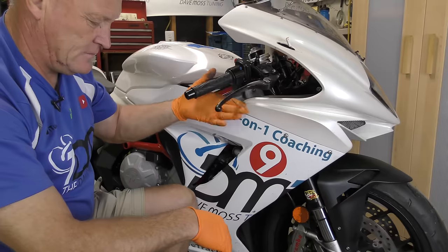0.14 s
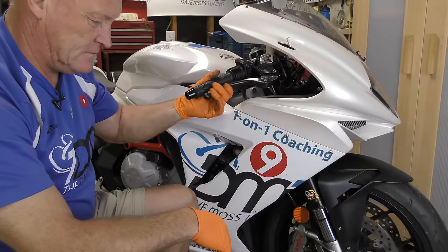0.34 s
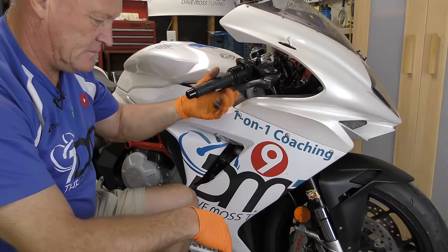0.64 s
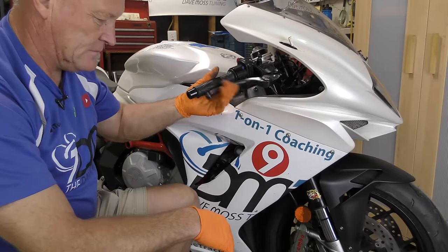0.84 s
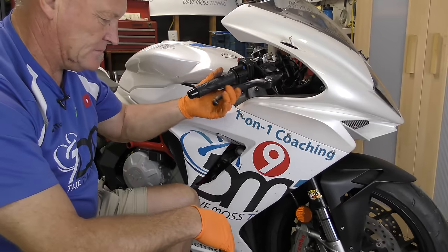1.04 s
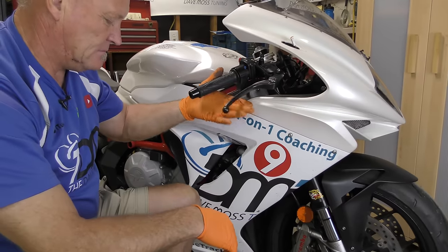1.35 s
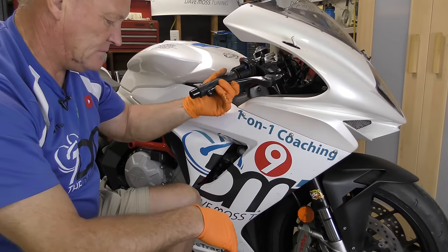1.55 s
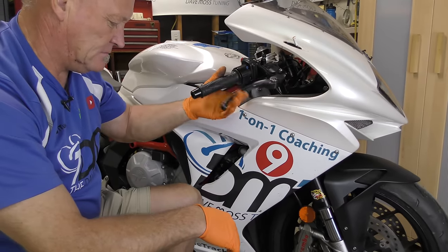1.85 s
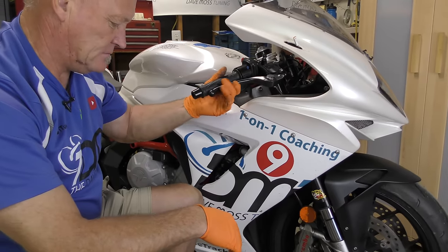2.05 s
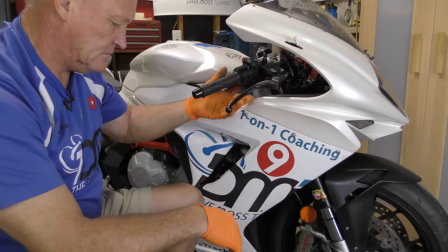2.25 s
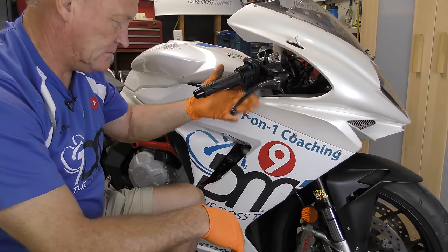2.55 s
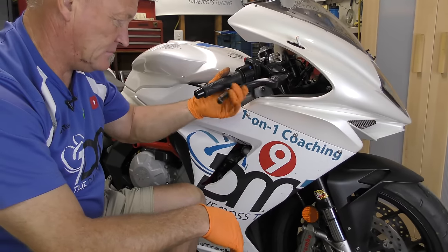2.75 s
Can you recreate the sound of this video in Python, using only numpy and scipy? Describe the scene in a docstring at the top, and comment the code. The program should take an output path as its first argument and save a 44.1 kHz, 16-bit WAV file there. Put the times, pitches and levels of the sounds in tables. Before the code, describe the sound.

Motorcycle brake lever pumped by a gloved hand, sharp double clacks repeating steadily, close and indoors

```python
"""In a workshop, a gloved hand pumps a motorcycle's front brake lever seven times.
Each time it slips from the fingers, clacks on its stop, rebounds, rattles and is caught, with ticks and glove squeaks.
The contacts are coloured noise bursts; handlebar and fairing answer with decaying modes and dense panel noise.
Squeaks and thin high whistles are gliding tones. Direct sound and room reverberation reach the microphone
over a steady room tone, with the extreme treble cut."""
import sys
import numpy as np
from scipy import signal
from scipy.fft import rfft, irfft
from scipy.io import wavfile
from scipy.ndimage import uniform_filter1d

SR = 44100
rng = np.random.default_rng(int(sys.argv[2]) if len(sys.argv) > 2 else 0)


def file_out(sig):
    """Save sig as 16-bit WAV at sys.argv[1]."""
    # one column per channel
    cols = np.atleast_2d(sig).T
    # limit, then scale
    lim = np.clip(cols, -1, 1)
    pcm = np.round(lim * 32767).astype(np.int16)
    wavfile.write(sys.argv[1], SR, pcm)


N = 127890  # samples in the whole scene
SIZE = 32768  # samples in one event
AGE = np.arange(SIZE) / SR  # seconds since an event began

# The lever hits its stop. Each row: start in seconds, relative level in dB.
CLACKS = [(.1178, -0.5), (0.4961, -0.5), (.8989, -0.5), (1.2819, 0), (1.7116, 0), (2.135, 0), (2.5550, 0)]
# It rebounds. Each row: start in seconds, relative level in dB.
REBOUNDS = [(.1392, -3), (0.516, -3), (0.9208, -3.5), (1.3044, -3.5), (1.7353, -4), (2.1581, -4),
            (2.5784, -5)]
# It rattles to rest. Each row: start in seconds, relative level in dB.
RATTLES = [(.1812, -9), (0.553, -11), (0.9648, -8.5), (1.3484, -8.5), (1.7798, -8), (2.2011, -9.5),
           (2.623, -8.5)]
# The fingers catch it. Each row: start in seconds, relative slap level in dB, relative dull knock level in dB.
CATCHES = [(.2700, -10.5, -5.5), (0.6495, -10, -4.5), (1.0393, -10, -1), (1.4361, -12, -12),
           (1.8584, -12, -8.5), (2.3030, -11.5, -10.5), (2.7187, -11.5, -9)]
# Small ticks as it is squeezed. Each row: start in seconds, relative level in dB.
TICKS = [(.7630, -22.5), (.8110, -31), (1.1455, -27), (1.1860, -27), (1.4095, -29), (1.5518, -21.5),
         (1.9634, -19), (2.4102, -19.5), (2.8243, -20)]
# The rubber glove squeaks. Each row: start in seconds, relative level in dB, start in Hz, end in Hz.
SQUEAKS = [(1.624, -38.5, 1613, 4060), (1.873, -44, 1766, 1810), (2.043, -33.5, 1613, 4530),
           (2.318, -39, 1775, 1920), (2.473, -42, 1640, 4050), (2.734, -35.5, 1757, 1820)]
# Faint falling whistles. Each row: start in seconds, length in seconds, start in Hz, end in Hz,
# relative level in dB.
WHISTLES = [(0.0, .07, 12750, 12000, -65), (1.49, .13, 12100, 10100, -64)]
# A rattle is a quick run of touches. Each row: delay in seconds, level change in dB.
TOUCHES = [(0.0, -2), (.0033, 1.5), (.0078, -8)]
# The bar rocks against the fairing afterwards. Each row: delay in seconds, level change in dB.
ROCKING = [(.003, -1), (.021, -0.5), (.049, -7)]

# Colours of the contacts. Each row: frequency in Hz, relative level in dB per Hz.
CLACK_COLOUR = [(300, -24.5), (900, -8.5), (1500, -10), (1950, -2.5), (2330, -8), (2650, -1), (3050, 1.5),
                (3350, -9), (3800, -12), (4600, -3), (4950, -11.5), (5700, -2.5), (6450, -8), (7100, -2.5),
                (8500, -7.5), (10200, -9.5), (11000, -15.5), (11900, -6.5), (13100, -15.5), (15500, -11.5),
                (17000, -36)]
REBOUND_COLOUR = [(400, -2), (1300, -13.5), (2050, -10.5), (2330, -20), (2950, -5.5), (3750, -14),
                  (4500, -6.5), (5100, -16.5), (5850, 1), (6600, -8), (7500, -3.5), (8500, -11.5),
                  (9500, -10.5), (10400, -3), (11200, -13), (13500, -15), (14600, -12), (17000, -38)]
RATTLE_COLOUR = [(400, -23), (1300, -3), (1600, -10), (2100, -8), (2400, -14), (3000, -5.5), (3800, -13),
                 (4400, -7), (5200, -14), (5900, -0.5), (6700, -10.5), (7800, -4), (8800, -11), (10100, -9),
                 (11500, -16), (13200, -18), (14500, -10.5), (17000, -39)]
SLAP_COLOUR = [(400, 6), (1500, -16), (2300, -10.5), (2600, 1.5), (3200, -4), (3600, -14.5), (4100, -8),
               (4900, -11.5), (5800, -4), (6900, -4.5), (8200, 1), (9200, 2.5), (9700, -2.5), (10200, -3.5),
               (10600, -0.5), (12800, -10), (14500, -4), (17000, -15)]
SLIP_COLOUR = [(400, 10), (1200, -8.5), (2400, -9), (3000, -3), (3700, -20), (4500, 3), (5000, -9),
               (5900, 0), (9200, -3), (10200, -10), (12500, -7), (16000, -22)]
TICK_COLOUR = [(240, -84), (400, 10), (719, 1), (1680, 0), (3210, -11), (4730, -7.5), (5190, -21),
               (5780, -7.5), (11600, -24), (16000, -51)]
# The dull knock after the catch. Each row: frequency in Hz, relative level in dB per Hz.
KNOCK_COLOUR = [(200, -26), (450, -10), (620, -4.5), (950, -4), (1300, -9), (1600, -14), (2600, -27),
                (5000, -22), (16000, -62)]
# Dense panel ringing. Each row: frequency in Hz, relative level in dB per Hz.
PANEL_COLOUR = [(150, -25.5), (300, -9), (430, -10.5), (540, 4), (720, -2), (1000, -12.5), (1400, -15.5),
                (2200, -17), (5000, -50), (16000, -77)]
# Modes of handlebar and fairing. Each row: nominal frequency in Hz, nominal relative level in dB,
# time to fall 60 dB in seconds.
BODY_MODES = [(341, -51.5, 0.22), (370.5, -45, 0.26), (495.2, -42, 0.2), (547.6, -33, 0.14),
              (596.6, -37, 0.17), (693.7, -34.5, .12), (725, -33, 0.065), (830, -41, 0.1),
              (917.4, -35, 0.07), (1007, -42.5, 0.052), (1223, -50, 0.44), (1322, -43.5, 0.12),
              (1338, -44.5, 0.22)]
# Drive of the body in dB, in this order: clack, rebound, rattle, knock, tick.
DRIVE_DB = (2.5, 2, 8.5, 3, 5)
# Colour of the workshop's reverberation. Each row: frequency in Hz, relative level in dB.
ROOM_COLOUR = [(100, 8), (500, -9.5), (1200, -15.5), (3000, -11.5), (6500, -17), (10000, -13.5),
               (16000, -17)]
# Its decay. Each row: frequency in Hz, time to fall 60 dB in seconds.
ROOM_T60 = [(200, 0.27), (1000, 0.3), (4000, 0.34), (8000, 0.37), (16000, 0.2)]
# Colour of the room tone. Each row: frequency in Hz, relative level in dB.
FLOOR_COLOUR = [(19, -37), (32, 3.5), (237, -7), (431, -9), (744, -10), (1070, -20.5), (1430, -21),
                (1670, -18), (2460, -26.5), (4710, -28.5), (5230, -30.5), (10600, -33), (16000, -42)]

CONTACT_DB, PANEL_DB, KNOCK_DB, FLOOR_DB = 6, -6.5, -7, -48
SLIP_LEAD_S, SLIP_DB = 0.0365, -18  # the glove slides off before each clack
FLICK_LEAD_S, FLICK_DB = 0.0079, -13  # and the fingertips let go
BUZZ_DELAY_S, BUZZ_DB = 0.0115, -13.5  # the loose lever buzzes on its pivot after the rebound
KNOCK_DELAY_S, TICK_KNOCK_DELAY_S = 0.016, 0.0095  # the body answers after a catch or a tick
KNOCK_LEAD_S = 0.00354  # the soft blow comes just ahead of the ringing
ALIKE = 0.39  # share of a contact's noise power that repeats from pump to pump
GRAIN_S = 0.001136  # spacing of the level changes within a rattle or rub
LOW_CUT_HZ = 340  # the small hard parts radiate little bass
GRIP_DETUNE, BODY_SPREAD_DB = 0.0303, 3  # typical shift of a mode, as a share of its pitch and in level
BODY_RISE_S = 0.0004  # the modes take a moment to build up
SQUEAK_RISE_S, SQUEAK_SWELL_S, SQUEAK_RASP = 0.008, 0.0067, 0.35  # pitch leap, swell peak, noise share
STOPBAND_HZ = 16700


def lever():
    """Hard parts and fingers meet in short cracks: slip, flick, clack, rebound, buzz, rattle, catch, tick."""
    slips = [(s - SLIP_LEAD_S, db + SLIP_DB) for s, db in CLACKS]
    flicks = [(s - FLICK_LEAD_S, db + FLICK_DB) for s, db in CLACKS]
    buzzes = [(s + BUZZ_DELAY_S, db + BUZZ_DB) for s, db in REBOUNDS]
    touches = followed(RATTLES, TOUCHES)
    slaps = [(s, slap_db) for s, slap_db, _ in CATCHES]

    out = contacts(slips, SLIP_COLOUR, attack_s=0.011, t60=0.076,
                   ring_db=-22, ring_t60=0.089, grain_db=10.5)
    out += contacts(flicks, REBOUND_COLOUR, attack_s=0.0002, t60=0.027, ring_db=-38, ring_t60=0.05)
    out += contacts(CLACKS, CLACK_COLOUR, attack_s=0.00031, t60=0.0074, ring_db=-14.5, ring_t60=0.054)
    out += contacts(REBOUNDS, REBOUND_COLOUR, attack_s=0.00063, t60=0.0065, ring_db=-21, ring_t60=0.12)
    out += contacts(buzzes, SLIP_COLOUR, attack_s=0.00076, t60=0.017,
                    ring_db=-15, ring_t60=0.22, grain_db=3)
    out += contacts(touches, RATTLE_COLOUR, attack_s=0.00047, t60=0.017,
                    ring_db=-16, ring_t60=0.15, grain_db=11.5)
    out += contacts(slaps, SLAP_COLOUR, attack_s=0.00026, t60=0.045,
                    ring_db=-30, ring_t60=0.1, grain_db=3)
    out += contacts(TICKS, TICK_COLOUR, attack_s=0.00019, t60=0.01, ring_db=-12, ring_t60=0.027)
    low_cut = signal.butter(2, LOW_CUT_HZ, "high", fs=SR, output="sos")
    return from_db(CONTACT_DB) * signal.sosfilt(low_cut, out)


def contacts(rows, spectrum, attack_s, t60, ring_db, ring_t60, grain_db=0):
    """A noisy crack and a weaker ring per row, partly alike; grain breaks them into tiny clicks."""
    attack = 1 - np.exp(-AGE / attack_s)
    shape = attack * (dying(t60) + from_db(ring_db) * dying(ring_t60))
    common = rng.standard_normal(SIZE)
    out = 0
    for s, db in rows:
        noise = np.sqrt(ALIKE) * common + np.sqrt(1 - ALIKE) * rng.standard_normal(SIZE)
        grain = np.interp(AGE / GRAIN_S, np.arange(SIZE), rng.uniform(-1, 1, SIZE))
        burst = shape * noise * from_db(grain_db * grain)
        out = out + place(s, from_db(db) * coloured(burst, spectrum))
    return out


def bodywork():
    """Every blow sets the handlebar and fairing ringing; the catch adds a soft knock."""
    knocks = [(s + KNOCK_DELAY_S, knock_db) for s, _, knock_db in CATCHES]
    tick_knocks = [(s + TICK_KNOCK_DELAY_S, db) for s, db in TICKS]
    kinds = (CLACKS, REBOUNDS, followed(RATTLES, ROCKING), knocks, tick_knocks)
    blows = [(s, db + drive_db) for rows, drive_db in zip(kinds, DRIVE_DB) for s, db in rows]

    modes = sum(place(s, from_db(db) * body_ring()) for s, db in blows)
    panels = contacts(blows, PANEL_COLOUR, attack_s=0.0015, t60=0.051, ring_db=-52, ring_t60=0.067)
    soft_blows = [(s - KNOCK_LEAD_S, db) for s, db in knocks]
    thuds = contacts(soft_blows, KNOCK_COLOUR, attack_s=0.0032, t60=0.021, ring_db=-11, ring_t60=0.26)
    return modes + from_db(PANEL_DB) * panels + from_db(KNOCK_DB) * thuds


def body_ring():
    """Decaying modes after one blow; the changing grip shifts their tuning, and their strengths vary."""
    hz, db, t60 = np.transpose(BODY_MODES)[:, :, None]
    detune, spread = rng.standard_normal((2, len(BODY_MODES), 1))
    tone = np.sin(2 * np.pi * hz * (1 + GRIP_DETUNE * detune) * AGE)
    modes = tone * dying(t60) * from_db(db + BODY_SPREAD_DB * spread)
    signs = (-1) ** np.arange(len(BODY_MODES))  # neighbouring modes start in opposite directions
    return signs @ modes * (1 - np.exp(-AGE / BODY_RISE_S))


def shudder(rows, level_db, hz, t60, lead_s, rise_s):
    """The handlebar sways for a few slow, dying cycles around each blow."""
    swing = np.sin(2 * np.pi * hz * AGE) * dying(t60) * (1 - np.exp(-AGE / rise_s))
    return sum(place(row[0] - lead_s, from_db(level_db) * swing) for row in rows)


def glove():
    """Rubber slips on the lever: a rough chirp, jittered in pitch, that moves upward."""
    swell = AGE / SQUEAK_SWELL_S
    shape = swell ** 2 * np.exp(2 * (1 - swell))
    out = 0
    for s, db, start_hz, end_hz in SQUEAKS:
        leap = 1 - np.exp(-(AGE / SQUEAK_RISE_S) ** 4)
        hz = start_hz + (end_hz - start_hz) * leap
        jitter = 1 + 0.47 * rng.standard_normal(SIZE)
        phase = 2 * np.pi * np.cumsum(hz * jitter) / SR
        rasp = SQUEAK_RASP * signal.lfilter([1], [1, -0.5], rng.standard_normal(SIZE))
        chirp = np.sin(phase) + 0.21 * np.sin(2 * phase) + rasp
        out = out + place(s, from_db(db) * shape * chirp)
    return out


def whistles(flutter_s=0.0093):
    """Thin, fluttering high tones glide down, with a random level and a jittered pitch."""
    out = 0
    for s, length, start_hz, end_hz, db in WHISTLES:
        along = np.clip(AGE / length, 0, 1)
        glide_hz = start_hz + (end_hz - start_hz) * along
        hz = glide_hz * (1 + 0.048 * rng.standard_normal(SIZE))
        flutter = np.interp(AGE / flutter_s, np.arange(SIZE), rng.standard_normal(SIZE))
        shape = np.sqrt(np.abs(np.sin(np.pi * along)))
        tone = np.sin(2 * np.pi * np.cumsum(hz) / SR)
        out = out + place(s, from_db(db) * flutter * shape * tone)
    return out


def workshop(x, build_s=0.017):
    """Diffuse reverberation: bands of noise that build up, then die each at its own rate."""
    edges = np.geomspace(100, 18000, 12)
    tail = 0
    for low, high in zip(edges, edges[1:]):
        hz = np.sqrt(low * high)
        band_filter = signal.butter(2, [low, high], "band", fs=SR, output="sos")
        band = signal.sosfilt(band_filter, rng.standard_normal(SIZE))
        build = 1 - np.exp(-(AGE / build_s) ** 2)
        band = unit(band * dying(at_hz(ROOM_T60, hz)) * build)
        width_gain = np.sqrt(2 * (high - low) / SR)  # wider bands carry more energy
        tail = tail + band * from_db(at_hz(ROOM_COLOUR, hz)) * width_gain
    return signal.fftconvolve(x, tail)[:N]


def room_tone():
    """Steady low rumble and hiss: noise coloured in the spectrum."""
    bins = rfft(rng.standard_normal(N))
    hz = np.arange(len(bins)) * SR / N
    tone = irfft(bins * from_db(at_hz(FLOOR_COLOUR, hz)), N)
    return from_db(FLOOR_DB) * np.sqrt(N) * unit(tone)


def followed(rows, pattern):
    """Every row sets off the same short pattern of blows."""
    return [(s + delay, db + change_db) for s, db in rows for delay, change_db in pattern]


def coloured(x, spectrum):
    """Minimum-phase filter that gives a burst the broad outline of a spectrum, at energy 1."""
    bins = rfft(x)
    outline = np.sqrt(uniform_filter1d(np.abs(bins) ** 2, size=400) + 1e-12)
    hz = np.arange(len(bins)) * SR / SIZE
    cepstrum = irfft(np.log(from_db(at_hz(spectrum, hz)) / outline))
    # Folding the cepstrum onto its first half keeps the filter from sounding early.
    response = np.exp(rfft(2 * cepstrum[:SIZE // 2], SIZE))
    return unit(irfft(bins * response))


def place(s, sound):
    """Put a sound at a time in seconds on an empty track."""
    i = max(int(s * SR), 0)
    return np.pad(sound, (i, N))[:N]


def dying(t60):
    """Exponential decay that falls 60 dB in t60 seconds."""
    return from_db(-60 * AGE / t60)


def unit(x):
    """Scale to energy 1."""
    return x / np.sqrt(np.sum(x ** 2) + 1e-20)


def at_hz(points, hz):
    """Read a table on a log-frequency axis."""
    f, value = np.transpose(points)
    return np.interp(np.log(hz + 1), np.log(f), value)


def from_db(db):
    """Decibels to amplitude gain."""
    return 10 ** (np.asarray(db) / 20)


def scene():
    """Direct sound and its reverberation, over the handlebar's shudder and the room tone."""
    direct = lever() + bodywork() + glove() + whistles()
    low = shudder(CLACKS, level_db=-26.5, hz=36, t60=0.3, lead_s=0.0034, rise_s=0.0013)
    low += shudder(RATTLES, level_db=-21.5, hz=34.4, t60=0.14, lead_s=0.001, rise_s=0.0012)
    low += shudder(CATCHES, level_db=-25.5, hz=35, t60=0.11, lead_s=0.0028, rise_s=0.0024)
    return (direct + workshop(direct) + low + room_tone())[None]


def record(dry):
    """A steep low-pass cuts the extreme treble, 60 dB down from the stopband edge."""
    return signal.sosfilt(signal.cheby2(16, 60, STOPBAND_HZ, fs=SR, output="sos"), dry)


dry = scene()
out = record(dry)
file_out(out)
```